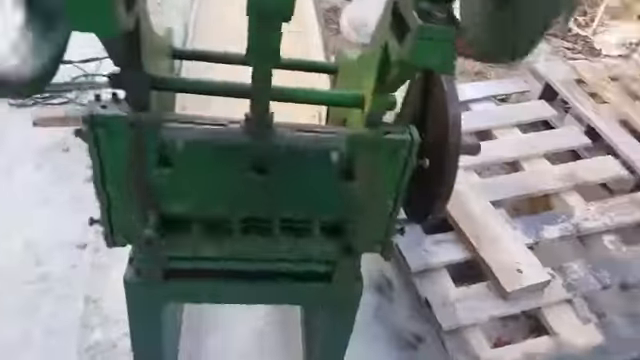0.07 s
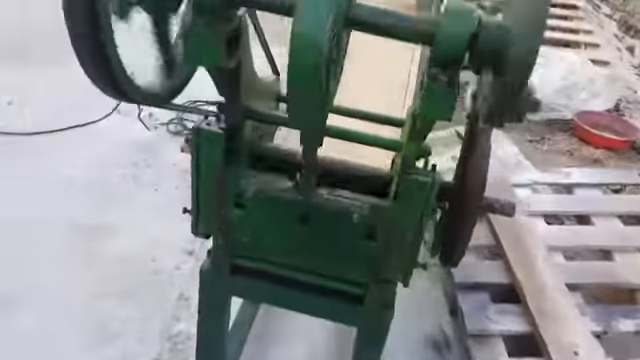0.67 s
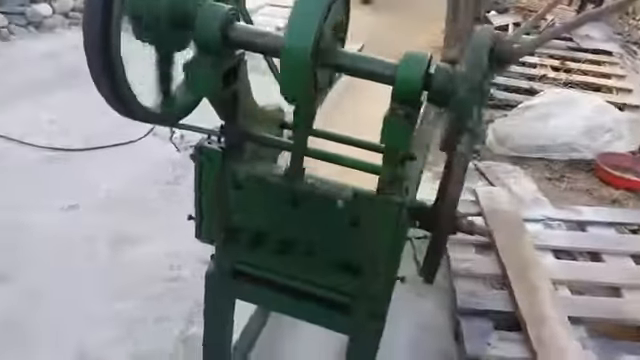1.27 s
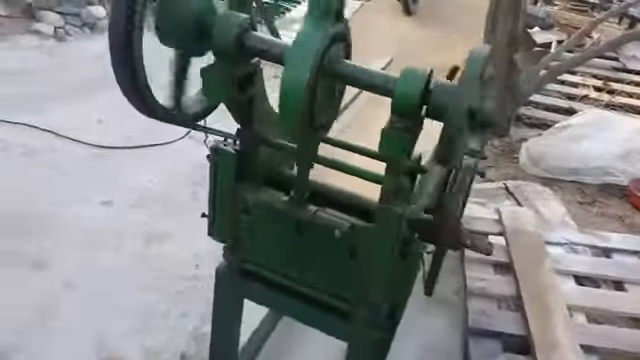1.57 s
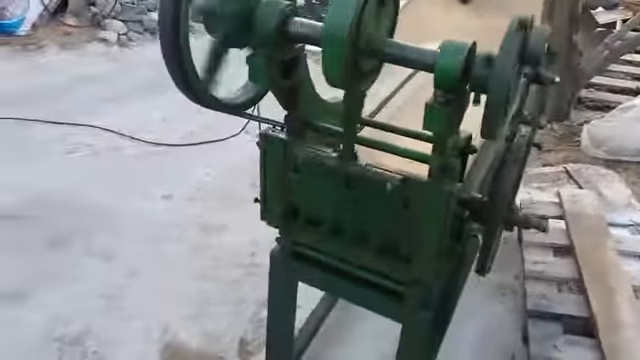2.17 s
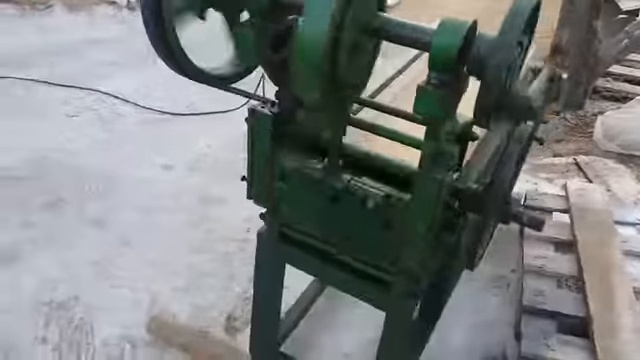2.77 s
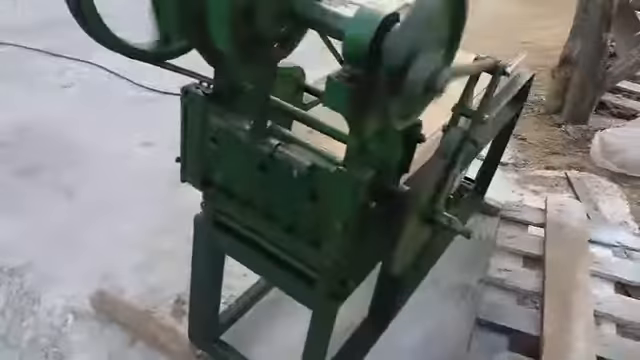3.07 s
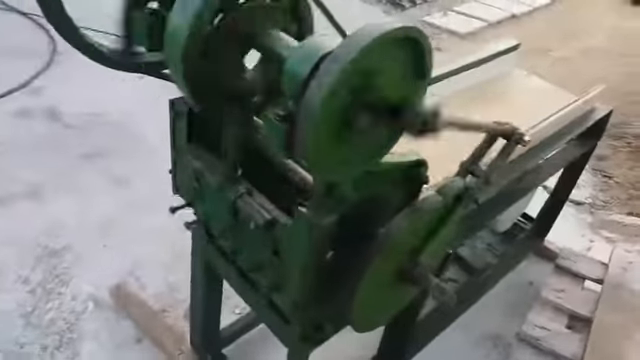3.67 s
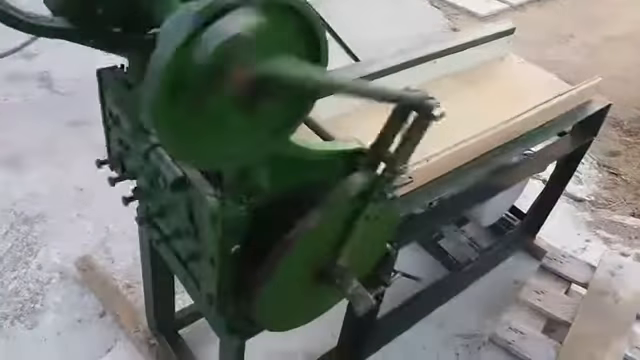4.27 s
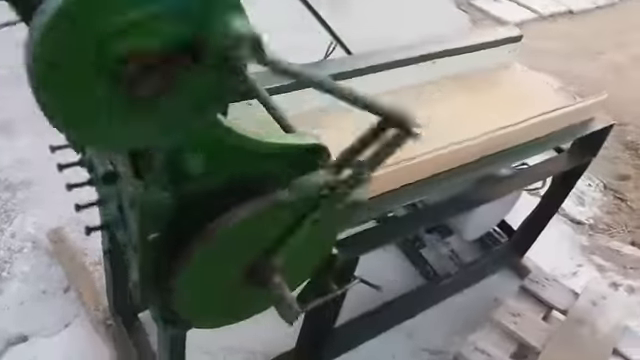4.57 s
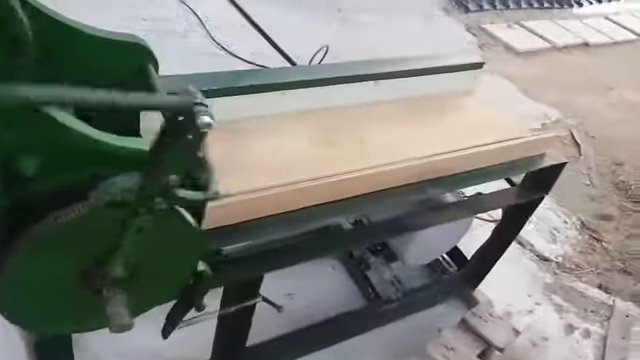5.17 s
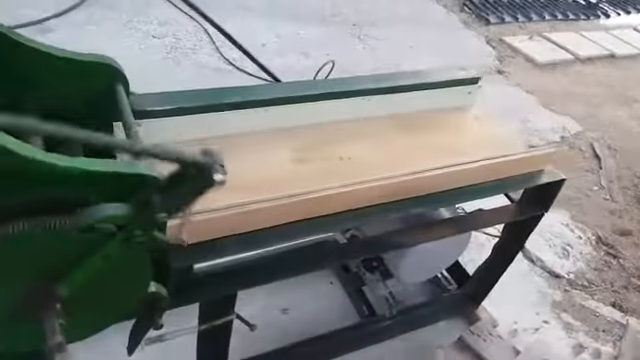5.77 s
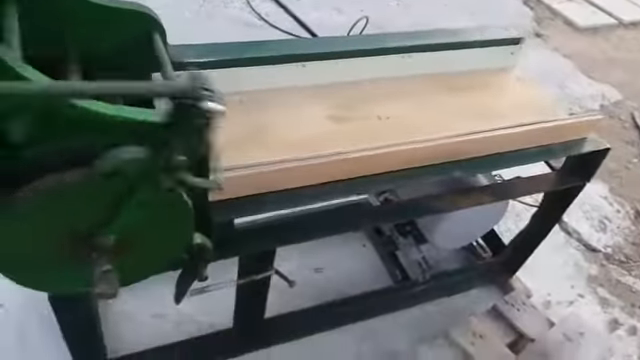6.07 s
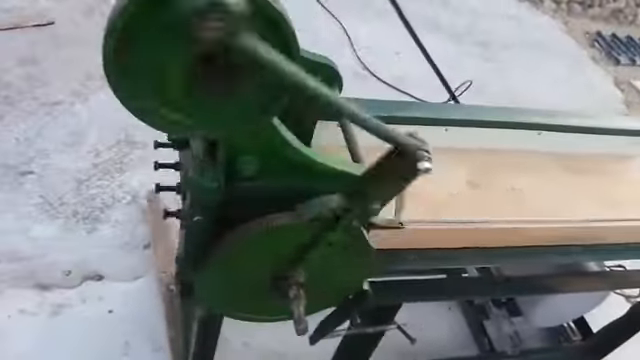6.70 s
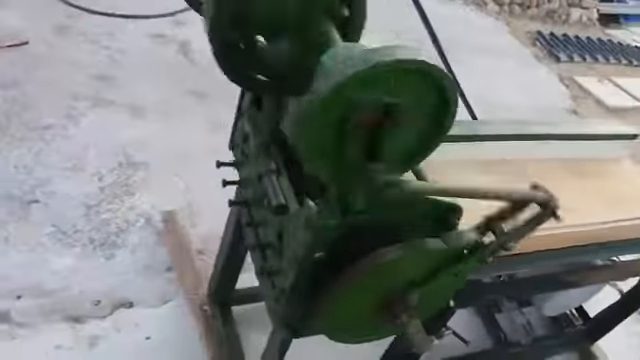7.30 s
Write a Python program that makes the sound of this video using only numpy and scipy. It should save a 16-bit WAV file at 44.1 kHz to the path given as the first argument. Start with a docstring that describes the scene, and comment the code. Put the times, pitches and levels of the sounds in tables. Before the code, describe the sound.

A motor-driven cutting machine runs empty on an outdoor concrete yard, clattering evenly nearly six times a second. Each stroke brings a blade slide knock, a gritty gear scrape and a quick run of ratchet ticks, over a low hum and ringing metal. The close microphone moves from the front around to the side, where the hum, ringing and a thin, high squeal grow somewhat stronger. Occasional sharper clinks stand out.

```python
"""A herb cutting machine runs empty on a concrete yard, its motor humming, its wheels and rods ringing.
On each 0.17 s turn of the crank the blade slide knocks the frame, the pawl shoves the gritty feed gear
on, then ticks back over the ratchet teeth. The phone starts at the front, where the slide is loudest,
and is carried round the machine; each part rings loudest in its own direction. At 6 s it reaches the
side, where hum and pawl squeal are strongest, then moves a little way back."""
import sys
import numpy as np
from scipy import signal
from scipy.fft import rfft, irfft, next_fast_len
from scipy.io import wavfile
from scipy.ndimage import uniform_filter1d

SR = 44100
rng = np.random.default_rng(int(sys.argv[2]) if len(sys.argv) > 2 else 0)


def output_pcm(signal):
    """Save a mono or channel-first signal as 16-bit PCM at the path in sys.argv[1].

    Samples are clipped to [-1, 1] before scaling.
    """
    pcm = np.clip(np.atleast_2d(signal).T, -1, 1) * 32767
    wavfile.write(sys.argv[1], SR, np.round(pcm).astype(np.int16))


N = 323694
TIME_S = np.arange(N) / SR
FFT_SIZE = next_fast_len(N, real=True)
FREQS_HZ = np.maximum(np.fft.rfftfreq(FFT_SIZE, 1 / SR), 1)
TURN_S, ENGAGE_S = .17463, -.0142  # crank period; a moment when the pawl engages

# phone's path, 0 = front: time_s, bearing_deg
WALK = [(0, -3), (1, 14), (2, 33.5), (3, 31), (3.75, 59), (4.3, 70), (4.8, 81), (6, 94), (6.5, 81.5),
        (7.34, 73)]
# one crank turn: turn_share, push_db, return_db, slide_db
CRANK_CYCLE = [(0, 10, -32, 6.5), (.055, 7, -33, 3.5), (.16, 7.5, -34, 4.5), (.36, 6.5, 2, 5.5),
               (.47, 3, -1, 4.5), (.6, -4.5, 2.5, 3.5), (.8, -5, 1, 3), (.9, 0, -2.5, 3.5),
               (1, -11, -24.5, 3)]

# jolts that ring the frame: start_s, level_db
FRAME_JOLTS = [(4.26, -26.5)]
# frame resonances: pitch_hz, width_hz, level_db
FRAME_MODES = [(204, 12, -5.5), (531, 28, -4), (1164, 21, 0.5), (1866, 16, 5), (5620, 37, -1),
               (8515, 30, 3)]
# frame's broad spectrum: freq_hz, level_db
FRAME_COLOUR = [(30, -48), (90, -21), (140, -12.5), (250, -5.5), (390, -12), (520, -9), (800, -6),
                (1250, -5.5), (1950, 1.5), (2400, -2.5), (2750, -17.5), (3400, -5.5), (7300, -15),
                (11000, -28.5)]
# feed table resonances: pitch_hz, width_hz, level_db
TABLE_MODES = [(530, 196, -6), (860, 120, -6), (1256, 380, -1)]
# resonances of the slide's landing: pitch_hz, width_hz, level_db
LANDING_MODES = [(310, 54, -4.5), (760, 390, -1.5), (1780, 1220, 0.5)]
# slide knocking in its guides: start_s, level_db, centre_hz
SLIDE_KNOCKS = [(0.336, -22, 1300), (0.491, -19, 1790), (1.205, -23, 1220), (1.362, -23, 1860),
                (2.762, -21.5, 1770), (3.515, -21.5, 1850), (6.488, -14.5, 1660), (6.8, -23, 960),
                (6.959, -20, 1230)]
# dull low bumps: start_s, level_db
LOW_BUMPS = [(3.38, -39), (4.44, -40), (4.63, -43)]

# ratchet lever hitting its stop: start_s, level_db
LEVER_CLINKS = [(4.282, -9), (4.3275, -6), (4.682, -13)]
# lever stop modes: pitch_hz, decay_s, level_db
STOP_MODES = [(4290, 0.0021, 1.5), (3554, 0.0013, -8), (5700, 0.0011, -5), (8460, 0.0012, -1.5)]
# hardest pawl drops onto a tooth: time_s, tip_db, lever_db
HARD_DROPS = [(1.684, -9, -27), (1.8295, -28, -8), (2.037, -7.5, -15), (2.3513, -6, -24), (3.7631, -5, -30),
              (3.9577, -6, -38), (4.3293, -11, -12.5), (4.9933, -15, -17.5), (5.1773, -11, -16.5),
              (5.3717, -10, -10), (7.0948, -15, -8)]
# pawl tip modes: pitch_hz, decay_s, level_db
TIP_MODES = [(7050, 0.002, 1.5), (7750, 0.00062, 3), (12750, 0.0022, -12), (9300, 0.0021, -17.5),
             (11660, 0.0056, -23)]
# ratchet lever modes: pitch_hz, decay_s, level_db
LEVER_MODES = [(4180, 0.0027, -1), (4910, 0.0014, -4), (3480, 0.0012, -25)]
# bouncing pawl resonances: pitch_hz, width_hz, level_db
BOUNCE_MODES = [(7040, 610, 6.8), (4160, 270, 8.7)]
# pawl spring resonances: pitch_hz, width_hz, level_db
SPRING_MODES = [(10120, 153, 10.5), (12720, 150, 8)]

# hard catches of the pawl: start_s, level_db
PAWL_BITES = [(2.086, 3), (2.796, 10.5), (3.829, -2), (5.408, -4), (5.578, 11.5), (5.755, 4.5)]
# feed gear resonances: pitch_hz, width_hz, level_db
GEAR_MODES = [(3800, 26, 5), (4475, 44, 9.5), (4920, 100, 5), (5515, 31, 4.5), (7360, 110, 5.5),
              (10220, 110, -1.5), (12130, 74, -0.5)]
# feed gear's broad spectrum: freq_hz, level_db
GEAR_COLOUR = [(400, -16), (1000, -6.5), (2000, -7), (2850, -5.5), (3500, 2), (4500, 2.5), (5700, -1.5),
               (6700, 2), (7400, -0.5), (8300, -2), (9300, -8), (11000, -15), (12500, -18.5)]
# gear rim resonances: pitch_hz, width_hz, level_db
RIM_MODES = [(3524, 70, -1.5), (3790, 17.5, 1.5)]
# resonance of the pawl pressed on a tooth: pitch_hz, width_hz, level_db
PRESSED_PAWL_MODES = [(7155, 280, 0)]
# pawl squeal resonances: pitch_hz, width_hz, level_db
SQUEAL_MODES = [(6195, 60, -1.5), (6150, 810, -17)]
# strokes that squeal louder: time_s, boost_db
SQUEAL_STROKES = [(.74, 4), (2.84, 6), (3.0, 3), (5.27, 5.5), (5.45, 5), (6.5, 7)]

# balance of the two microphone ports: freq_hz, left_minus_right_db
PORT_BALANCE = [(40, 0), (120, -3.5), (400, -2.5), (1200, -1.5), (4200, -2.5), (5300, 3.9), (6200, 10.6),
                (7200, 14.7), (8500, 11), (10200, 8.9), (12800, 12)]
# likeness of the two ports: freq_hz, correlation
PORT_LIKENESS = [(30, 0.1), (130, 0.66), (400, 0.89), (1000, 0.48), (2000, 0.27), (5000, 0.018)]


def undb(db):
    """Decibels to gain."""
    return 10 ** (np.asarray(db) / 20)


def unit(x):
    """Scale to rms 1."""
    return x / np.sqrt(np.mean(x ** 2))


def along(table, at):
    """Interpolate each column over the first."""
    first, *columns = np.transpose(table)
    return [np.interp(at, first, column) for column in columns]


def over_hz(points):
    """Interpolate (freq_hz, value) points on a log-frequency axis."""
    hz, value = np.transpose(points)
    return np.interp(np.log(FREQS_HZ), np.log(hz), value)


def wobble(rate_hz):
    """Gaussian values at rate_hz, joined by straight lines."""
    knots_s = np.arange(int(8 * rate_hz) + 2) / rate_hz
    return np.interp(TIME_S, knots_s, rng.standard_normal(N)[:len(knots_s)])


def grit(rate_hz, spread_db):
    """Randomly fluctuating gain, as of uneven contact."""
    return undb(spread_db * wobble(rate_hz))


def crank(time_s):
    """Turns completed at time_s."""
    return (time_s - ENGAGE_S) / TURN_S


def each_turn(turn, spread_db):
    """Random level in dB, held for one turn."""
    return spread_db * rng.standard_normal(100)[turn.astype(int)]


def pumped(turn, peak_share, depth_db):
    """Level in dB that swells once a turn."""
    return depth_db * np.cos(2 * np.pi * (turn - peak_share))


def facing(best_deg, width_deg, away_db):
    """Level in dB, along the walk, of a part that radiates best towards one bearing."""
    bearing_deg, = along(WALK, TIME_S)
    return away_db * (1 - np.exp(-((bearing_deg - best_deg) / width_deg) ** 2))


def blows(table, decay_s):
    """Force of (start_s, level_db) blows: quick swell, exponential decay."""
    ages = [np.maximum(TIME_S - start_s, 0) / decay_s for start_s, _ in table]
    return sum(undb(db) * age * np.exp(1 - age) for age, (_, db) in zip(ages, table))


def resonances(modes, colour=None):
    """Gain of resonances on a broad spectrum; a mode radiates little far below its pitch."""
    power = 0
    for hz, width_hz, db in modes:
        offset = (FREQS_HZ - hz) / (.78 * width_hz)
        power += undb(db) ** 2 * np.minimum(FREQS_HZ / hz, 1) / (1 + offset ** 2) ** 2
    return np.sqrt(power + (0 if colour is None else undb(over_hz(colour)) ** 2))


def shake(force, body_gain):
    """Random contact forces ring a body; stereo, rms 1, most alike in the low mids."""
    cepstrum = irfft(np.log(body_gain + body_gain.max() / 1e4), FFT_SIZE)[:FFT_SIZE // 2]
    minimum_phase = np.exp(rfft(np.r_[cepstrum[0], 2 * cepstrum[1:]], FFT_SIZE))
    mid, side = rfft(force * rng.standard_normal((2, N)), FFT_SIZE) * minimum_phase
    alike = np.clip(over_hz(PORT_LIKENESS), 0, 1)
    ports = mid * np.sqrt(1 + alike) + np.array([[1], [-1]]) * side * np.sqrt(1 - alike)
    return unit(irfft(ports, FFT_SIZE)[:, :N])


def strike(starts_s, levels_db, modes, detune_cycles, scatter_db, size=1536):
    """Short metal taps; each lands differently, so its modes vary in pitch and level."""
    out, age_s = np.zeros((2, N + size)), np.arange(size) / SR
    for hz, decay_s, mode_db in modes:
        draws = rng.standard_normal((len(starts_s), 5))
        envelope = (age_s / decay_s * np.exp(1 - age_s / decay_s)) ** 2
        for start_s, tap_db, draw in zip(starts_s, levels_db, draws):
            i = int(np.clip(start_s * SR, 0, N))
            pitch_hz = hz + draw[0] * detune_cycles / decay_s  # broad modes stray furthest
            ring = envelope * np.sin(2 * np.pi * (pitch_hz * age_s + draw[1:3, None]))
            out[:, i:i + size] += undb(tap_db + mode_db + scatter_db * draw[3:, None]) * ring
    return out[:, :N]


def drone(pitch_hz, width_hz, flutter_db):
    """Ring sustained by shaking: phase wanders, level flutters."""
    wander_rad = np.cumsum(rng.standard_normal(N)) * np.sqrt(2 * np.pi * width_hz / SR)
    phase_rad = 2 * np.pi * pitch_hz * TIME_S + uniform_filter1d(wander_rad, size=200)
    # short waves reach the ports out of step
    apart_rad = 2.7055 * wobble(rate_hz=6) * min(pitch_hz / 1500, 1)
    return unit(np.sin([phase_rad, phase_rad + apart_rad]) * grit(np.pi * width_hz, flutter_db))


def jangle(x, path_gain, longest_s, change_hz, paths=8):
    """Treble also takes longer paths through the moving linkage, so resonances keep shifting."""
    out = x.copy()
    treble = signal.sosfilt(signal.butter(2, 1200, "high", fs=SR, output="sos"), x)
    for lag in (rng.uniform(.1, 1, paths) * longest_s * SR).astype(int):
        delayed = np.pad(treble, ((0, 0), (lag, 0)))[:, :N]
        out += path_gain / np.sqrt(paths) * wobble(change_hz) * delayed
    return unit(out)


def motor(turn):
    """The motor hums, the drive drones above it; both throb with each turn's load."""
    hum_db = -46.5 + facing(best_deg=96, width_deg=26, away_db=-8)
    hum_db += pumped(turn, peak_share=0.38, depth_db=3.5)
    drive_db = -54 + pumped(turn, peak_share=0.099, depth_db=2.5)
    hum = undb(hum_db) * drone(pitch_hz=122, width_hz=6, flutter_db=4)
    drive = undb(drive_db) * drone(pitch_hz=212.2, width_hz=14, flutter_db=6.5)
    return hum + drive


def frame_and_wheel(turn):
    """Each blade stroke pumps the frame's ring, each return the ratchet wheel's."""
    frame_db = -33.5 + facing(best_deg=72, width_deg=25, away_db=-10)
    frame_db += pumped(turn, peak_share=0.83, depth_db=2)
    frame_gain = undb(frame_db) + blows(FRAME_JOLTS, decay_s=0.044)
    frame = frame_gain * drone(pitch_hz=1403, width_hz=11, flutter_db=2.5)
    wheel_db = -31.5 + facing(best_deg=90, width_deg=29, away_db=-7)
    wheel_db += pumped(turn, peak_share=.75, depth_db=2.5)
    wheel = undb(wheel_db) * drone(pitch_hz=3232, width_hz=21, flutter_db=4)
    return frame + wheel


def low_bumps():
    """A few dull bumps near 75 Hz."""
    force = blows(LOW_BUMPS, decay_s=0.0083)
    return np.sqrt(np.mean(force ** 2)) * shake(force, resonances([(75, 54, 0)]))


def guide_knocks():
    """Now and then the slide knocks harder in its guides: bursts of band noise."""
    out = 0
    for start_s, level_db, centre_hz in SLIDE_KNOCKS:
        band = signal.butter(2, centre_hz * np.exp([-.275, .275]), "band", fs=SR, output="sos")
        noise = unit(signal.sosfilt(band, rng.standard_normal((2, N))))
        out += blows([(start_s, level_db)], decay_s=0.0095) * noise
    return out


def blade_slide(turn, slide_db):
    """The slide rumbles through cast frame and feed table, and lands just before the pawl engages."""
    stroke_db = each_turn(turn + 0.43, spread_db=1.17) + facing(best_deg=0, width_deg=8.1, away_db=-2.5)
    force = undb(slide_db + 0.84 * stroke_db)
    force *= grit(rate_hz=500, spread_db=2) * grit(rate_hz=59, spread_db=1.5)
    frame = shake(force, resonances(FRAME_MODES, FRAME_COLOUR))
    frame = jangle(frame, path_gain=1, longest_s=.012, change_hz=12)
    age = (turn + .12) % 1 / 0.11  # decay times since the landing
    landing = shake(undb(stroke_db) * age * np.exp(-age), resonances(LANDING_MODES))
    table = shake(force, resonances(TABLE_MODES)) * undb(facing(best_deg=80, width_deg=11, away_db=-9))
    return undb(-24) * frame + undb(-35) * landing + undb(-31.5) * table


def lever_clinks():
    """The loose ratchet lever taps its stop."""
    return strike(*np.transpose(LEVER_CLINKS), STOP_MODES, detune_cycles=0.053, scatter_db=5)


def ratchet(turn, return_db, teeth_hz=92, drop_spread_db=2.5):
    """The returning pawl drops from tooth to tooth and bounces in between; its spring sings."""
    hard_s, hard_tip_db, hard_lever_db = np.transpose(HARD_DROPS)
    drops_s = np.cumsum(np.exp(.25 * rng.standard_normal(1000))) / teeth_hz
    clear_of_hard = np.abs(drops_s[:, None] - hard_s).min(axis=1) > .006
    drops_s = drops_s[(drops_s < TIME_S[-1]) & clear_of_hard]
    starts_s = np.r_[hard_s, drops_s] - .001  # contact precedes the ring's peak
    rattle_db = return_db + each_turn(turn, spread_db=0.67)
    rattle_db += facing(best_deg=57, width_deg=40, away_db=-5)
    drop_db = np.interp(drops_s, TIME_S, rattle_db) - 18
    drop_db += drop_spread_db * rng.standard_normal(len(drops_s))
    lever_facing_db = np.interp(drops_s, TIME_S, facing(best_deg=82, width_deg=19, away_db=-5))
    tip_db = np.r_[hard_tip_db - 4, drop_db]
    lever_db = np.r_[hard_lever_db + 1, drop_db + lever_facing_db]
    tip = strike(starts_s, tip_db, TIP_MODES, detune_cycles=0.077, scatter_db=0.5)
    lever = strike(starts_s, lever_db, LEVER_MODES, detune_cycles=.12, scatter_db=1.5)
    bounces = shake(undb(rattle_db) * grit(rate_hz=700, spread_db=7.5), resonances(BOUNCE_MODES))
    spring = shake(undb(2.2 * return_db) * grit(teeth_hz, spread_db=5), resonances(SPRING_MODES))
    spring *= undb(facing(best_deg=84, width_deg=17, away_db=-17.5))
    return tip + lever + undb(-26.5) * bounces + undb(-27.5) * spring


def feed_gear(turn, push_db):
    """The pawl shoves the gear on: dry teeth scrape, the rim rings, the loaded pawl rings and squeals."""
    contact = grit(rate_hz=170, spread_db=2) * grit(rate_hz=3000, spread_db=2)
    push = undb(push_db + each_turn(turn, spread_db=0.86)) + blows(PAWL_BITES, decay_s=0.0041)
    force = contact * push
    scrape_db = facing(best_deg=68, width_deg=55, away_db=-6.5)
    scrape = shake(force * undb(scrape_db), resonances(GEAR_MODES, GEAR_COLOUR))
    scrape = jangle(scrape, path_gain=3, longest_s=.009, change_hz=14)
    squeal_db = each_turn(turn, spread_db=2.5) + facing(best_deg=97.6, width_deg=18, away_db=-7.5)
    for time_s, boost_db in SQUEAL_STROKES:
        squeal_db[turn.astype(int) == int(crank(time_s))] += boost_db
    squeal = shake(contact * push ** 1.4 * undb(squeal_db), resonances(SQUEAL_MODES))
    rim = shake(force, resonances(RIM_MODES)) * undb(facing(best_deg=58, width_deg=21, away_db=-18.5))
    pawl = shake(force, resonances(PRESSED_PAWL_MODES))
    pawl *= undb(facing(best_deg=44, width_deg=43, away_db=-24))
    return undb(-21.5) * scrape + undb(-26) * squeal + undb(-24) * rim + undb(-25.5) * pawl


def scene():
    """The whole machine on one steady crank, heard from the moving phone."""
    turn = crank(TIME_S)
    push_db, return_db, slide_db = along(CRANK_CYCLE, turn % 1)
    # the lull at the linkage's dead point varies in depth from turn to turn
    dead_point = np.exp(-((turn % 1 - .93) / 0.087) ** 2)
    lull_db = each_turn(turn + 0.43, spread_db=0.9) * dead_point
    gear = feed_gear(turn, push_db + lull_db) + ratchet(turn, return_db + lull_db) + lever_clinks()
    blade = blade_slide(turn, slide_db + 0.31 * lull_db) + guide_knocks()
    return gear + blade + low_bumps() + frame_and_wheel(turn) + motor(turn)


def record(dry):
    """Left port much brighter than right; peaks rounded, top cut."""
    balance_db = over_hz(PORT_BALANCE)
    port_gains = undb(np.array([balance_db, -balance_db]) / 2)
    ports = irfft(rfft(dry, FFT_SIZE) * port_gains, FFT_SIZE)[:, :N]
    rounded = ports / (1 + ports ** 4) ** .25
    top_hz = 13150
    return signal.sosfilt(signal.ellip(10, .2, 70, top_hz, fs=SR, output="sos"), rounded)


dry = scene()
out = record(dry)
output_pcm(out)
```